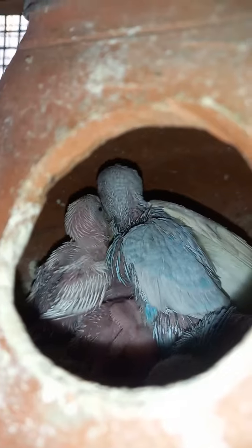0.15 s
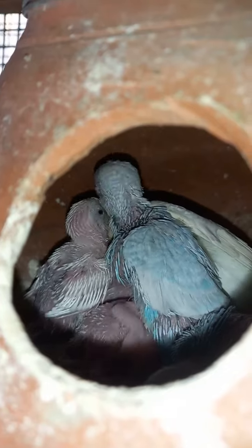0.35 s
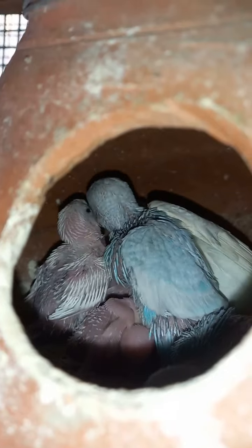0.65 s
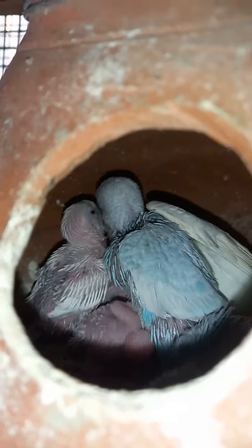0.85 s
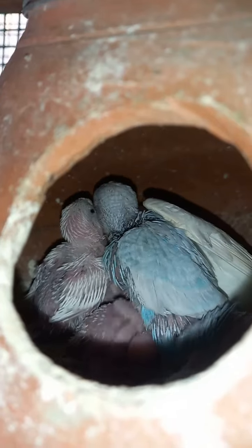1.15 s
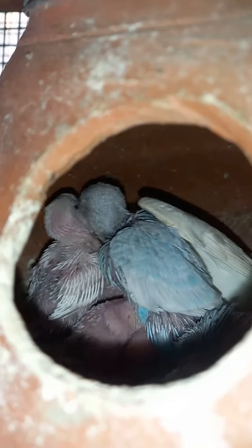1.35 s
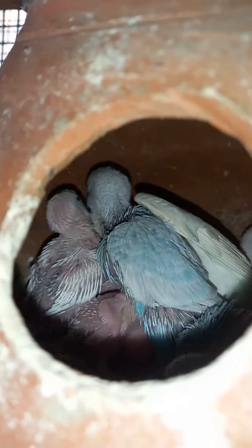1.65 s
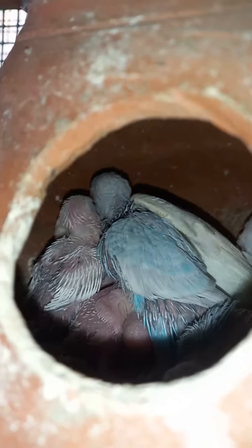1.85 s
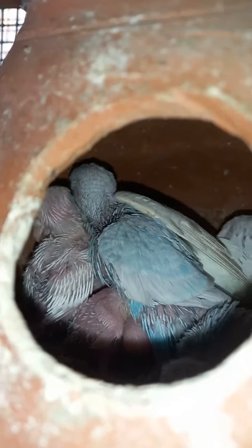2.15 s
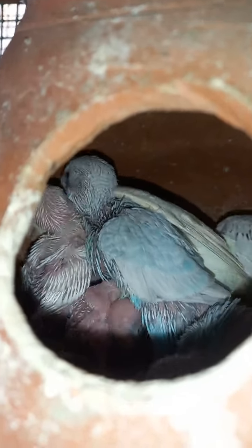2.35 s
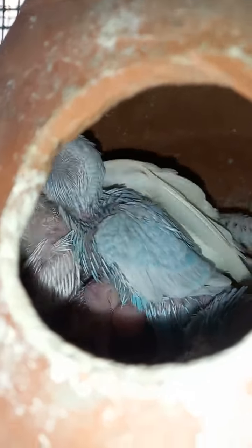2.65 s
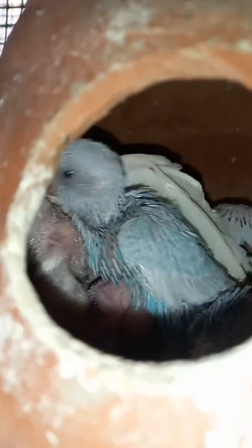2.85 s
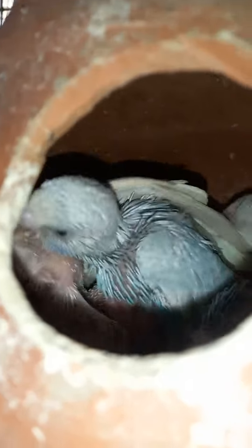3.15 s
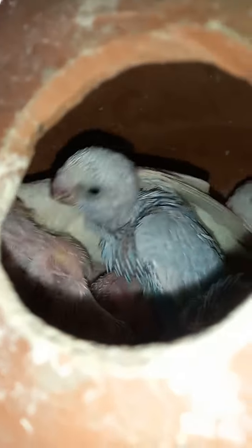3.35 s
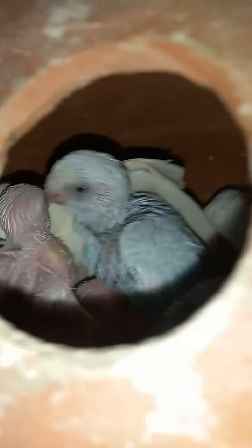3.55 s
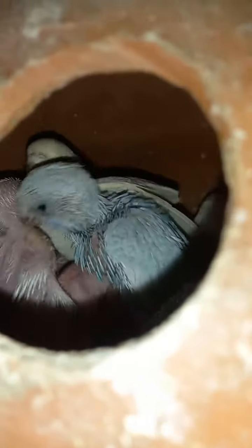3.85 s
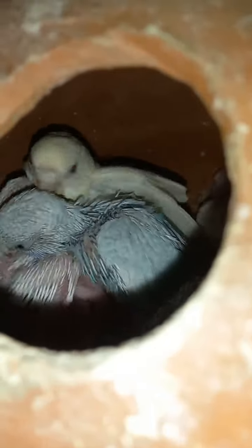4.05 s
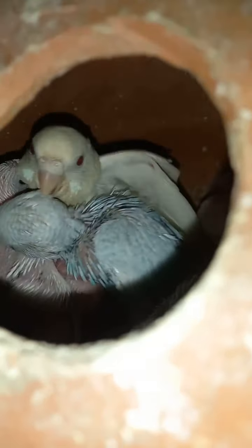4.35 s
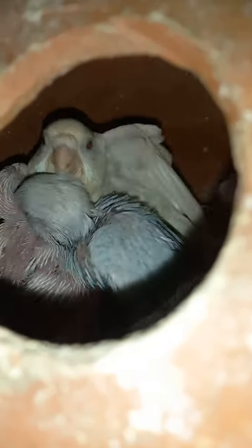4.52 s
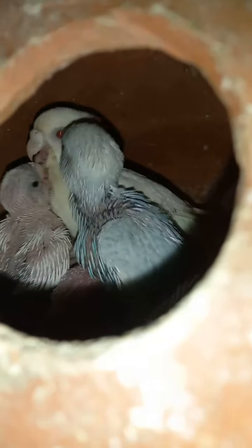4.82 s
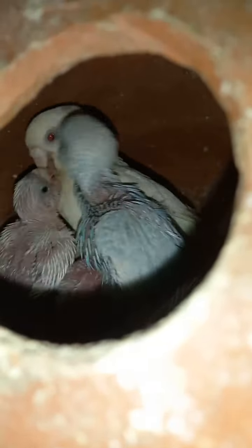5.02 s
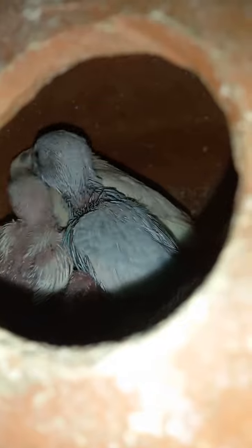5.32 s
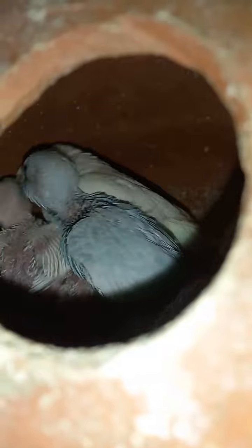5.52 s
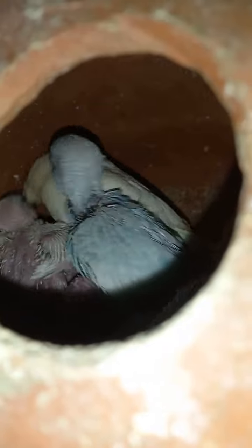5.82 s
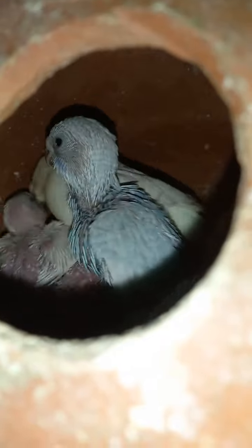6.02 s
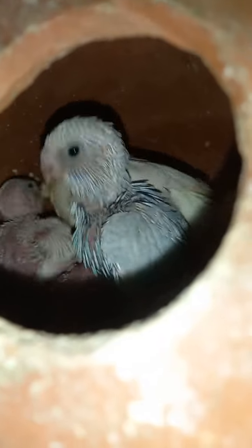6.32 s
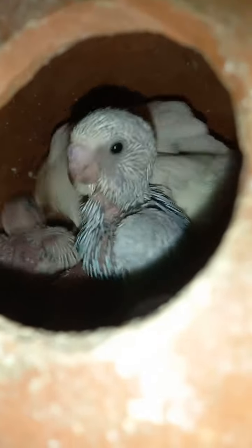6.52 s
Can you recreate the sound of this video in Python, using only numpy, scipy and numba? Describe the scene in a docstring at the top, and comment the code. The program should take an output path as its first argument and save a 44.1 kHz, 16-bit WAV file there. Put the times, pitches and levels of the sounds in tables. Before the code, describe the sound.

Close, raspy, high-pitched begging from a crowded nest of young parakeets, with sharp squeals near three and four seconds over soft low wing rustling.

```python
"""Budgerigar chicks beg in a clay nest pot: hoarse rasps, gliding peeps, tiny pips and two loud broken squeals.
Voices are phase-driven tones with random shake; rasps and hiss are shaped noise; pips are short tone bursts.
Chatter, hiss and croaks fill in behind; wings quiver in bouts of low noise over a faint room rumble.
The pot adds a brief dense ring, different at each of two close microphones; a gain control tames the squeals."""
import sys
import numpy as np
from scipy import signal
from scipy.fft import rfft, irfft, next_fast_len
from scipy.io import wavfile
from scipy.ndimage import uniform_filter1d, map_coordinates
from numba import njit

SR = 44100
rng = np.random.default_rng(int(sys.argv[2]) if len(sys.argv) > 2 else 0)


def generate_wav(sig):
    """Save sig (samples, or channels by samples) to the path in sys.argv[1] as 16-bit PCM at SR."""
    pcm = np.round(np.clip(np.atleast_2d(sig).T, -1, 1) * 32767).astype(np.int16)
    wavfile.write(sys.argv[1], SR, pcm)


N = 294588
CALL_T = np.arange(-SR // 50, SR // 5) / SR  # s, from 20 ms before a call's start


def amp(db):
    """Decibels to gain."""
    return 10 ** (np.asarray(db) / 20)


def unit(x):
    """Scale to rms 1."""
    return x / np.sqrt(np.mean(np.abs(x) ** 2) + 1e-20)


def along(points, hz):
    """(hz, value) points interpolated on a log frequency axis."""
    point_hz, value = np.transpose(points)
    return np.interp(np.log(hz + 1), np.log(point_hz + 1), value)


def curve(points):
    """(time_s, value) points interpolated to one value per sample."""
    time_s, value = np.transpose(points)
    return np.interp(np.arange(N) / SR, time_s, value)


def wobble(rate_hz, size=N):
    """Smooth random curve through rate_hz random knots a second."""
    knots = rng.standard_normal(int(size * rate_hz / SR) + 4)
    return map_coordinates(knots, [np.arange(size) * rate_hz / SR], mode="mirror")


def filtered(x, response):
    """Apply a gain that is a function of frequency in Hz."""
    size = x.shape[-1]
    fft_size = next_fast_len(size + 4096)
    spectrum = rfft(x, fft_size) * response(np.fft.rfftfreq(fft_size, 1 / SR))
    return irfft(spectrum, fft_size)[..., :size]


def noise(colour):
    """Two unrelated noises of the given spectrum, joint rms 1."""
    return unit(filtered(rng.standard_normal((2, N)), lambda hz: amp(along(colour, hz))))


def ragged(x, depth_db):
    """A chaotic syrinx: short-lived partials flicker in and out of the noise."""
    z = signal.stft(x, nperseg=256, noverlap=192)[2]
    field = uniform_filter1d(rng.standard_normal(z.shape[1:]), size=3, axis=0)
    field = uniform_filter1d(field, size=5, axis=1)
    flickering = signal.istft(z * amp(depth_db * unit(field)), nperseg=256, noverlap=192)[1]
    return unit(flickering[:, :x.shape[1]])


def edge(t_s, width_s):
    """Sine-shaped fade across t_s = 0, four widths long, 40 ms at most."""
    return (1 + np.sin(np.pi / 2 * np.clip(t_s / min(2 * width_s, 1 / 50), -1, 1))) / 2


def gate(t_s, length_s, rise_s, fall_s):
    """Window from 0 to length_s with soft edges."""
    return edge(t_s, rise_s) * edge(length_s - t_s, fall_s)


def bouts(table, attack_s, release_s):
    """Strength of (start_s, end_s, db) bouts that build up, hold and die away; powers add."""
    t, power = np.arange(N) / SR, np.zeros(N)
    for start_s, end_s, db in table:
        build = 1 - np.exp(-np.maximum(t - start_s, 0) / attack_s)
        decay = np.exp(-np.maximum(t - end_s, 0) / release_s)
        power += (amp(db) * build * decay) ** 2
    return np.sqrt(power)


def sides(pan_db):
    """Left and right gains of constant total power."""
    return unit(amp(np.array([[pan_db], [-pan_db]]) / 2))


def nearly_mono(pair, side_db):
    """Long waves reach both microphones almost alike."""
    return pair[0] + amp(side_db) * np.array([pair[1], -pair[1]])


def add(track, start_s, x):
    """Mix x into track from start_s on."""
    i = round(start_s * SR)
    part = x[:, max(-i, 0):max(N - i, 0)]
    track[:, max(i, 0):max(i, 0) + part.shape[1]] += part


# low resonances of pot and cage: centre_hz, width_hz, boost_db
HOLLOW_MODES = [(83, 25, 5), (105.6, 4.7, 9), (171, 31, 1.5), (226.6, 6, 3.5), (546, 20, 2.5)]


def hollow(x):
    """The hollow of the pot colours low sounds with its resonances; rms 1."""
    def boost_db(f):
        return sum(db / (1 + ((f - hz) / width * 2) ** 2) for hz, width, db in HOLLOW_MODES)
    return unit(filtered(x, lambda f: amp(boost_db(f))))


# rumble spectrum: freq_hz, relative_density_db
ROOM_COLOUR = [(25, -30), (60, -16), (110, -30), (230, 19), (350, 7.5), (700, -16), (1500, -6), (4000, -9)]


def room_rumble():
    """Steady low noise, nearly alike at both microphones."""
    return amp(-61.5) * hollow(nearly_mono(noise(ROOM_COLOUR), side_db=-4))


# quivering and brief shuffles: start_s, end_s, relative_level_db
WING_BOUTS = [(0.0, 0.12, -34.5), (0.27, 0.42, -42.5), (0.45, 0.64, -46.5), (0.78, 1.09, -36.5),
              (1.21, 1.41, -35), (1.45, 1.67, -43.5), (1.78, 1.85, -51), (1.96, 2.1, -50),
              (2.12, 2.19, -44.5), (2.52, 2.57, -57), (2.68, 2.82, -51.5), (2.87, 3.03, -40.5),
              (3.17, 3.62, -40), (3.64, 4.0, -38.5), (4.05, 4.32, -47), (4.39, 4.46, -55),
              (4.58, 4.7, -48.5), (4.91, 4.96, -52), (5.19, 5.28, -47), (5.36, 5.45, -52), (5.6, 5.7, -41),
              (5.72, 5.88, -33.5), (5.92, 6.19, -38), (6.33, 6.56, -49), (6.64, 6.69, -55)]
# wing noise spectrum: freq_hz, relative_density_db
FLUTTER_COLOUR = [(18, -51), (30, -38), (61, -3), (108, 1.5), (155, 4), (182, -8.5), (224, 5.5),
                  (309, -7.5), (453, 0), (1000, -15), (1300, -32), (2200, -120)]
WING_ATTACK_S, WING_RELEASE_S, SETTLE_RELEASE_S = 0.0069, 0.028, 0.15
SETTLE_REL_DB, RUSTLE_REL_DB = -6, -62.5  # soft settling after bouts; feathers never quite still


def wings(beat_rate_hz, beat_db):
    """Quivering wings brush the pot and pump its air: low noise with an uneven flutter."""
    quiver = bouts(WING_BOUTS, WING_ATTACK_S, WING_RELEASE_S)
    settle = amp(SETTLE_REL_DB) * bouts(WING_BOUTS, WING_ATTACK_S, SETTLE_RELEASE_S)
    strength = np.sqrt(quiver ** 2 + settle ** 2 + amp(RUSTLE_REL_DB) ** 2)
    flutter = nearly_mono(noise(FLUTTER_COLOUR), side_db=-8.5) * amp(beat_db * wobble(beat_rate_hz))
    return strength * hollow(flutter)


# ring time of the clay walls: freq_hz, t60_s
POT_DECAY = [(500, 0.043), (3000, 0.067), (12000, 0.069)]


def pot(x, wet_db, size=8192):
    """The clay walls return a short dense ring, unlike at each microphone, changing as the birds move."""
    ring, padded = np.zeros((2, N)), np.pad(x, ((0, 0), (size, size)))
    for i in range(-size // 2, N, size // 2):
        # each overlapping piece of sound gets a fresh random tail
        hz, t, z = signal.stft(rng.standard_normal((2, SR // 16)), SR, nperseg=128)
        decay = amp(-60 * t / along(POT_DECAY, hz)[:, None])
        tail = signal.istft(z * decay, SR, nperseg=128)[1]
        tail = tail / np.linalg.norm(tail, axis=1, keepdims=True)
        piece = padded[:, i + size:i + 2 * size] * np.sqrt(np.hanning(size))
        add(ring, i / SR + 1 / 1000, signal.fftconvolve(piece, tail, axes=1))
    return (x + amp(wet_db) * ring) / np.hypot(1, amp(wet_db))


GLIDE_EASE = 1.35  # above 1, a note glides fast at first and then levels off


def syrinx(length_s, first_hz, last_hz, hoarse, jitter, rasp_rate_hz):
    """Phase and complex strength of one gliding note; hoarseness shakes both."""
    t = CALL_T[CALL_T < length_s + 1 / 50]
    shake = np.array([wobble(rasp_rate_hz, size=len(CALL_T))[:len(t)] for _ in range(3)])
    hoarse = np.clip(hoarse, 0, 1)
    glide_hz = last_hz + (first_hz - last_hz) * (1 - np.clip(t / length_s, 0, 1)) ** GLIDE_EASE
    shaken_hz = glide_hz * (1 + jitter * np.sqrt(hoarse) * shake[0])
    phase = 2 * np.pi * np.cumsum(shaken_hz) / SR
    strength = np.sqrt(1 - hoarse) + np.sqrt(hoarse / 2) * (shake[1] + 1j * shake[2])
    return phase, strength


def chatter(centre_hz, spread, climb, hoarse, life_s, count):
    """Many overlapping little gliding chirps of the smaller chicks; overall rms 1."""
    out = np.zeros((2, N))
    for i, (when, pitch, life, slope, pan, lead) in enumerate(rng.triangular(-1, 0, 1, (count, 6))):
        length_s = np.clip(life_s * np.exp(life), .008, .12)
        hz = centre_hz * np.exp(spread * pitch)
        glide = np.exp(climb + 0.1006 * slope)
        phase, strength = syrinx(length_s, hz / glide, hz * glide, hoarse, jitter=0.018, rasp_rate_hz=700)
        voice = strength * np.exp(1j * phase) * gate(CALL_T[:len(phase)], length_s, 1 / 300, 1 / 200)
        ports = sides(7 * pan) * np.exp(1j * np.array([[0], [2 + 2 * lead]]))
        start_s = (i - 2) / (count - 2) * N / SR + .012 * when
        add(out, start_s, (ports * voice).real)
    return unit(out)


# chatter contour, also the floor of the croaking: time_s, relative_level_db
CHATTER_LEVEL = [(0.0, -31), (0.18, -30), (0.35, -26.5), (0.5, -25.5), (0.91, -30), (1.04, -33),
                 (1.26, -31), (1.47, -31), (1.65, -32), (1.84, -30), (2.51, -31), (2.9, -27.5), (3.14, -30),
                 (3.4, -30), (3.68, -33), (3.98, -28), (4.13, -34), (4.37, -32), (4.86, -33), (5.32, -31),
                 (5.6, -27.5), (5.95, -28.5), (6.31, -31), (6.36, -31.5), (6.51, -28.5), (6.68, -42)]


def brood_chirps(chatter_db):
    """The chatter's pitched chirps under a slow contour and a quick uneven wobble."""
    chirps = chatter(3100, spread=.32, climb=0.0391, hoarse=0.56, life_s=0.01618, count=900)
    return amp(chatter_db + 3.5 + 0.79 * wobble(23)) * chirps


# hiss contour: time_s, relative_level_db
HISS_LEVEL = [(0.0, -32.5), (0.33, -33), (0.72, -29.5), (0.93, -29.5), (1.17, -43), (1.3, -29.5),
              (1.69, -27), (1.93, -29), (2.18, -33), (2.44, -28), (3.83, -32), (4.0, -37.5), (4.24, -56),
              (4.39, -36), (4.71, -32.5), (5.08, -37), (5.36, -30), (5.64, -35), (5.95, -27), (6.12, -28.5),
              (6.29, -21.5), (6.68, -34.5)]
# hiss spectrum: freq_hz, relative_db
HISS_COLOUR = [(1000, -50), (3000, 13.5), (4200, 8), (6000, 6), (8000, 4), (11000, -9.5), (13500, -3),
               (16000, -15)]


def brood_hiss():
    """Soft breathy noise, flickering and grainy."""
    grains = noise(HISS_COLOUR) * amp(2.45 * wobble(400))
    return amp(curve(HISS_LEVEL) + 2) * ragged(grains, depth_db=7.0)


# low croaking bouts: start_s, end_s, relative_level_db
CROAK_BOUTS = [(0.1, 0.145, -33), (0.3, 0.42, -36.5), (0.54, 0.63, -32.5), (0.69, 0.72, -32),
               (0.86, 1.06, -32.5), (1.63, 1.68, -39), (1.77, 1.83, -35.5), (1.96, 2.07, -32),
               (2.14, 2.21, -33), (2.48, 2.58, -31.5), (2.69, 2.75, -34), (3.35, 3.52, -41.5),
               (3.66, 3.81, -37), (3.92, 4.0, -43), (4.64, 4.79, -37.5), (5.16, 5.26, -39),
               (5.62, 5.88, -37), (5.95, 6.07, -41), (6.12, 6.2, -31.5), (6.64, 6.69, -31.5)]
# croak spectrum: freq_hz, relative_db
CROAK_COLOUR = [(150, -17), (400, -15.5), (700, -12), (1100, -8), (1650, -2), (2200, 1), (3000, 2.5),
                (5000, -23.5)]
CROAK_ATTACK_S, CROAK_RELEASE_S, GRUMBLE_REL_DB = 0.0068, 0.005, -9.5


def brood_croaks(chatter_db):
    """Ragged low noise plus low chirps, in bouts over an ever-present grumble."""
    bout = bouts(CROAK_BOUTS, CROAK_ATTACK_S, CROAK_RELEASE_S)
    strength = np.hypot(bout, amp(chatter_db + GRUMBLE_REL_DB))
    rough = ragged(noise(CROAK_COLOUR) * amp(1.9 * wobble(250)), depth_db=1.5)
    low_chirps = chatter(1850, spread=0.42, climb=-0.0601, hoarse=0.55, life_s=0.02, count=400)
    return strength * (amp(3.5) * rough + amp(0.3) * low_chirps)


def brood():
    """Croaks, chirps and hiss go on between the nearer calls."""
    chatter_db = curve(CHATTER_LEVEL)
    return brood_croaks(chatter_db) + brood_chirps(chatter_db) + brood_hiss()


# very short pips: time_s (crest 2.3 ms later), relative_level_db, pitch_hz
PIP_CALLS = [(0.615, -10, 5970), (0.6305, -23, 6000), (0.684, -12, 5550), (0.7247, -11, 5700),
             (0.7364, -22, 5660), (3.1667, -11, 5830), (3.1842, -22, 5470), (3.204, -16, 5600),
             (3.216, -12, 5850), (3.226, -14, 5530), (3.301, -12, 6900), (3.3428, -15, 5360),
             (4.2664, -19, 6600), (4.407, -12, 6440), (4.415, -13, 6560), (4.4446, -15, 5660),
             (4.556, -14, 5870), (4.579, -16, 5450), (4.6149, -17, 5860), (4.643, -13.5, 5700),
             (4.6833, -18, 5370), (6.136, -12, 5470), (6.1485, -8, 5540), (6.292, -15, 5500),
             (6.3919, -20, 5200)]
# partials of a pip: pitch_ratio, relative_db
PIP_PARTIALS = [(1, -1.5), (1.45, -8), (1.8, -14), (2.35, -17)]


def pips(width_s, sweep_per_s):
    """Each pip is a few milliseconds of rising tone with higher partials."""
    out, t = np.zeros((2, N)), np.arange(-SR // 100, SR // 100) / SR
    leads_rad = rng.uniform(0, 2 * np.pi, (len(PIP_CALLS), 2, 1))
    for (time_s, db, hz), lead_rad in zip(PIP_CALLS, leads_rad):
        phase = 2 * np.pi * hz * (t + sweep_per_s * t ** 2 / 2) + lead_rad
        tone = sum(amp(level) * np.sin(ratio * phase) for ratio, level in PIP_PARTIALS)
        add(out, time_s + t[0] + 0.0023, amp(db) * tone * np.exp(-(t / width_s) ** 2))
    return out


# hissing rasps: start_s, end_s, relative_level_db, beak_hz, brightness_db
RASP_CALLS = [(0.0, 0.065, -23.5, 8700, -9), (0.144, 0.283, -24.5, 6760, 5), (0.29, 0.386, -27, 6400, 5.5),
              (0.388, 0.457, -22.5, 5950, 1), (0.504, 0.608, -27.5, 8700, -12),
              (0.621, 0.75, -26.5, 8950, -3), (0.731, 0.814, -26.5, 8540, 1),
              (0.813, 0.887, -22.5, 5000, 4.5), (1.108, 1.198, -24, 7500, 4), (1.205, 1.336, -25, 6950, 4),
              (1.345, 1.388, -24.5, 8000, 7), (1.407, 1.525, -22, 6160, 8), (1.536, 1.604, -26, 7750, 6),
              (1.645, 1.728, -21.5, 5540, 5.5), (1.761, 1.847, -20.5, 4700, 2),
              (1.848, 1.913, -24, 6960, 9.5), (2.206, 2.269, -23.5, 7740, 10.5),
              (2.321, 2.471, -23.5, 5840, 9), (2.497, 2.556, -27, 5800, 4), (2.577, 2.69, -24.5, 6700, 5),
              (2.691, 2.75, -29, 4800, 9), (2.786, 2.878, -23.5, 8600, -2.5),
              (2.899, 3.01, -29.5, 4500, -14), (3.106, 3.145, -19.5, 6650, 8),
              (3.222, 3.308, -25, 5500, 5.5), (3.344, 3.413, -25.5, 6850, 3.5),
              (3.454, 3.503, -22.5, 4600, 1), (3.538, 3.594, -26.5, 7840, 1), (3.623, 3.697, -28, 7900, -3),
              (3.767, 3.875, -29.5, 7900, 0), (3.951, 4.055, -27.5, 8800, -7), (4.194, 4.284, -28, 6350, 6),
              (4.298, 4.414, -29, 8500, -4), (4.449, 4.562, -27.5, 8300, 5), (4.69, 4.727, -27, 9400, -1),
              (4.778, 4.85, -28.5, 8700, 2), (4.859, 4.927, -26.5, 5350, 6), (4.955, 5.099, -27, 5960, 5.5),
              (5.116, 5.213, -32, 6150, 1), (5.23, 5.36, -31, 6250, 6), (5.374, 5.46, -27.5, 7000, 4),
              (5.46, 5.54, -26.5, 8600, -8), (5.621, 5.683, -24.5, 4540, 1), (5.731, 5.794, -25.5, 4760, 1),
              (5.89, 5.938, -26, 6050, 11), (5.971, 6.111, -27, 6500, 6.5), (6.116, 6.182, -28.5, 5700, 2),
              (6.189, 6.276, -22.5, 5560, 5), (6.284, 6.366, -23, 5300, 4), (6.374, 6.477, -22.5, 9500, -7),
              (6.555, 6.628, -24.5, 7650, 5), (6.624, 6.69, -27, 7900, -11)]
# common rasp spectrum: freq_hz, relative_db
RASP_COLOUR = [(300, -55), (900, -21), (1800, -5.5), (2800, 0), (4000, 4.5), (5500, 2), (7500, -2),
               (10500, -8), (13300, -12.5), (16000, -14.5)]
RASP_PAN_DB, RASP_PAN_SCATTER_DB = -0.8, 3.9


def rasps(grain_db, grain_rate_hz, ragged_db, beak_db, beak_width_hz, rise_s, fall_s):
    """Air forced through the syrinx in irregular puffs and coloured by the open beak."""
    out, size = np.zeros((2, N)), len(CALL_T)
    for start_s, end_s, db, beak_hz, bright_db in RASP_CALLS:
        def response(hz):
            beak = beak_db / (1 + ((hz - beak_hz) / beak_width_hz) ** 2)
            tilt = bright_db * np.clip((hz - 7000) / 4000, 0, 1)
            return amp(along(RASP_COLOUR, hz) + beak + tilt)
        pan_db = RASP_PAN_DB + RASP_PAN_SCATTER_DB * rng.standard_normal()
        puffs = ragged(rng.standard_normal((2, size)), ragged_db)
        puffs = puffs * amp(grain_db * wobble(grain_rate_hz, size=size))
        hiss = unit(filtered(puffs, response)) * gate(CALL_T, end_s - start_s, rise_s, fall_s)
        add(out, start_s + CALL_T[0], amp(db) * sides(pan_db) * hiss)
    return out


def notes(table, throat, jitter, rasp_rate_hz, throb_db, throb_rate_hz, rise_s, fall_s):
    """Voiced notes with overtones 2 to 4, each reaching the microphones from its own place."""
    out = np.zeros((2, N))
    for start_s, end_s, first_hz, last_hz, db, hoarse, pan_db, lead_rad, overtones_db in table:
        length_s = max(end_s - start_s, 1 / 200)
        mean_hz = (first_hz + last_hz) / 2
        phase, strength = syrinx(length_s, first_hz, last_hz, hoarse, jitter, rasp_rate_hz)
        overtones = sum(amp(along(throat, k * mean_hz)) * np.exp(1j * k * phase) for k in range(2, 5))
        window = gate(CALL_T[:len(phase)], length_s, rise_s, fall_s)
        # where throb_db is above 0 the membranes beat unevenly and pulse the note
        uneven = 1 + wobble(104.4, size=len(CALL_T))[:len(phase)] / 2
        beats = np.cumsum(throb_rate_hz * uneven) / SR
        strength = strength * amp(throb_db * np.sin(2 * np.pi * beats)) * window
        envelope = unit(strength) * np.sqrt(np.mean(window ** 2))
        voice = envelope * (np.exp(1j * phase) + amp(overtones_db) * overtones)
        ports = sides(pan_db) * np.exp(1j * np.array([[lead_rad], [-lead_rad]]) / 2)
        add(out, start_s + CALL_T[0], amp(db) * (ports * voice).real)
    return out


# seat of each chick, by name: left_right_db, left_lead_rad
CHICK_SEATS = {"front": (1.1, 1.4), "back": (1.5, -1.84), "left": (18, -1.1), "right": (-17, 2.2),
               "middle": (1, 0.3)}
# overtone strength of begging notes: freq_hz, relative_db
PEEP_THROAT = [(2000, -18), (7000, -14), (10500, -18.5), (13500, -23), (16000, -36)]
BEGGING_OVERTONES_DB = -10


def begging(table):
    """Peeps and mutters share one throat and a pulsing throb."""
    return notes(table, PEEP_THROAT, jitter=0.052, rasp_rate_hz=1000, throb_db=3.0, throb_rate_hz=130,
                 rise_s=0.015, fall_s=0.012)


# low mutters: start_s, end_s, first_pitch_hz, relative_level_db
MUTTER_CALLS = [(0.582, 0.633, 1060, -47), (1.02, 1.067, 1270, -29.5), (1.612, 1.67, 2150, -28),
                (1.951, 1.983, 1620, -30), (2.058, 2.134, 1500, -37), (2.132, 2.163, 1127, -32),
                (3.069, 3.085, 1820, -13), (3.199, 3.225, 2220, -20.5), (3.35, 3.39, 2300, -25),
                (4.76, 4.806, 1750, -30), (4.847, 4.887, 1340, -43), (5.951, 5.983, 1820, -28)]
MUTTER_SAG_OCT_PER_S, MUTTER_HOARSE = 3.44, .12


def mutters():
    """Low voiced notes from the front seat, all sagging at the same rate."""
    table = []
    for start_s, end_s, first_hz, db in MUTTER_CALLS:
        last_hz = first_hz * 2 ** (-MUTTER_SAG_OCT_PER_S * (end_s - start_s))
        table.append((start_s, end_s, first_hz, last_hz, db, MUTTER_HOARSE,
                      *CHICK_SEATS["front"], BEGGING_OVERTONES_DB))
    return begging(table)


# begging peeps: start_s, end_s, first_pitch_hz, last_pitch_hz, relative_level_db, hoarse_0_to_1, seat
PEEP_CALLS = [(0.07, 0.123, 3230, 2920, -25, 0.22, "front"),
              (0.303, 0.366, 3140, 3640, -15.5, 0.9, "front"), (0.367, 0.438, 2890, 3280, -22, 1, "middle"),
              (0.473, 0.499, 3790, 3706, -11, 0.2, "middle"),
              (0.468, 0.508, 2590, 2630, -19.5, 0.23, "middle"),
              (0.54, 0.597, 2956, 2870, -19.5, .48, "front"), (0.592, 0.63, 2000, 2070, -22.5, 0, "front"),
              (0.643, 0.676, 2740, 3150, -18.5, 0.15, "left"), (0.716, 0.8, 2910, 4250, -16.5, 0.3, "back"),
              (0.785, 0.813, 3420, 3030, -18.5, 0.18, "left"), (0.92, 1.01, 3040, 4230, -15, 0.52, "back"),
              (1.021, 1.072, 3030, 3520, -17, 0.5, "front"), (1.356, 1.41, 3225, 3213, -22, 0.45, "front"),
              (1.441, 1.5, 3160, 2980, -22, 0.3, "left"), (1.518, 1.57, 2925, 2950, -16.5, 0.3, "left"),
              (1.552, 1.641, 3574, 3800, -15, 0.16, "front"), (1.642, 1.699, 2900, 3115, -14, 1, "back"),
              (1.679, 1.745, 3660, 3760, -13, 0.12, "front"),
              (1.792, 1.852, 3310, 3650, -14.5, 0.7, "back"), (1.872, 1.899, 3990, 3760, -10, .15, "front"),
              (1.926, 1.996, 3920, 3676, -15.5, 0.38, "front"),
              (2.001, 2.059, 3475, 3540, -13.5, 1, "front"),
              (2.072, 2.126, 3970, 3665, -16.5, 0.06, "back"),
              (2.272, 2.328, 3050, 3183, -19.5, 0.4, "left"), (2.54, 2.585, 3510, 3920, -22.5, .4, "right"),
              (2.684, 2.742, 3110, 3020, -15.5, 0.6, "left"), (2.76, 2.795, 3020, 3110, -18, 0, "left"),
              (2.876, 2.943, 3400, 3960, -16, 0.65, "back"),
              (2.983, 3.006, 3480, 3480, -13.5, .72, "front"),
              (3.157, 3.195, 3050, 2460, -26, 0.13, "front"),
              (3.315, 3.354, 3020, 3110, -19.5, 0.05, "left"),
              (3.562, 3.639, 3010, 2970, -23, 0.26, "back"), (3.629, 3.69, 3990, 4490, -22, 0.7, "back"),
              (3.812, 3.898, 3530, 3850, -18, 0.8, "back"), (3.955, 4.002, 3730, 3980, -17.5, 0.8, "back"),
              (4.324, 4.355, 2810, 3070, -20, 0.16, "left"), (4.394, 4.421, 2930, 3190, -27, 0.15, "right"),
              (4.612, 4.68, 3326, 2910, -26.5, .3, "front"), (4.741, 4.794, 2994, 2730, -24, 0.44, "front"),
              (4.893, 4.995, 2800, 4230, -18.5, 0.4, "back"), (5.126, 5.209, 2880, 3010, -28, 0.4, "front"),
              (5.365, 5.409, 3920, 4340, -16, .43, "front"), (5.473, 5.51, 4050, 3750, -12.5, 0.55, "back"),
              (5.5, 5.553, 3620, 3630, -14, 0.06, "back"), (5.579, 5.623, 2895, 3600, -19.5, 0.63, "left"),
              (5.642, 5.716, 3890, 3556, -13.5, 0.36, "back"),
              (5.713, 5.757, 2470, 2450, -23.5, .2, "middle"),
              (5.738, 5.777, 3720, 3760, -16.5, 0.3, "back"), (5.808, 5.84, 3570, 3880, -19, 0.22, "left"),
              (5.828, 5.859, 2980, 3440, -11.5, 0.11, "back"), (5.872, 5.905, 3140, 3910, -14.5, 0, "left"),
              (5.894, 5.922, 6020, 6120, -20, 0.3, "right"), (5.911, 5.963, 3110, 4100, -18.5, 0.1, "back"),
              (5.969, 6.013, 6500, 6500, -17.5, 0.5, "middle"),
              (6.037, 6.07, 3020, 2975, -19, 0.44, "front"), (6.06, 6.093, 6580, 6200, -16, .4, "back"),
              (6.158, 6.24, 3095, 2836, -19.5, 0.8, "middle"),
              (6.414, 6.485, 3560, 3700, -19, 0.84, "back"),
              (6.48, 6.531, 3795, 3450, -10.5, 0.38, "front")]


def peeps():
    """Gliding, more or less hoarse notes, each from its chick's seat."""
    return begging([(*note, *CHICK_SEATS[seat], BEGGING_OVERTONES_DB) for *note, seat in PEEP_CALLS])


# squeaks and squeals, the long ones broken by pitch jumps:
# start_s, end_s, first_pitch_hz, last_pitch_hz, relative_level_db, hoarse_0_to_1,
# left_right_db, left_lead_rad, overtones_db
SQUEAL_CALLS = [(2.15, 2.186, 4430, 4730, -11.5, 0.38, -1, -1.5, 11),
                (2.32, 2.365, 5090, 4980, -19.5, 0.32, -1, 1.5, 4),
                (2.695, 2.785, 4700, 4290, -18.5, 0.28, 0, 1.1, 5),
                (3.038, 3.046, 4260, 4140, -2, 0.11, 0, 0.74, 3),
                (3.047, 3.072, 3283, 3405, -7, .12, 1, 4, 5.5),
                (3.07, 3.085, 4200, 4190, -11.5, 0.55, -3, 3.5, -8),
                (3.083, 3.112, 3286, 3470, -3.5, 0.18, 1.5, 4, 4.5),
                (3.108, 3.152, 3526, 3550, -5.5, 0.8, 0, 4.5, -3),
                (4.043, 4.061, 4320, 4190, -12.5, .2, -3, 1.5, 9),
                (4.061, 4.087, 3460, 3570, -5.5, 0.11, 9, 8, -20),
                (4.091, 4.116, 3700, 3570, -5, 0.24, -0.5, 4, -11),
                (4.116, 4.152, 3360, 3606, -3, 0.5, 4, 4, -7.5)]
# overtone strength of squeals: freq_hz, relative_db
SQUEAL_THROAT = [(3000, -18), (6800, -15.5), (8800, -23.5), (10500, -34), (13500, -21.5), (16000, -11)]


def squeals():
    """Loud voiced notes; abutting pieces at different pitches break a long squeal."""
    return notes(SQUEAL_CALLS, SQUEAL_THROAT, jitter=0.046, rasp_rate_hz=870, throb_db=0.0,
                 throb_rate_hz=135.6, rise_s=0.0039, fall_s=0.0087)


def scene():
    """All the chicks in their pot, the squealing one nearest, over wings and room rumble."""
    hisses = rasps(grain_db=1.74, grain_rate_hz=550, ragged_db=3.5, beak_db=8, beak_width_hz=930,
                   rise_s=0.0077, fall_s=0.018)
    calls = brood() + amp(-0.5) * pips(width_s=0.0012, sweep_per_s=11)
    calls = calls + amp(2.5) * hisses + amp(-0.5) * (mutters() + peeps())
    flutter = amp(-1.0) * wings(beat_rate_hz=47, beat_db=0.7)
    return room_rumble() + flutter + pot(calls, wet_db=-3.5) + pot(amp(2.5) * squeals(), wet_db=-6.5)


@njit
def follow(power, attack, release):
    """Level detector that rises fast and falls slowly; times in samples."""
    out, level = np.empty_like(power), 0.0
    for i in range(len(power)):
        level += (power[i] - level) / (attack if power[i] > level else release)
        out[i] = level
    return out


LIMIT_DB, LIMIT_ATTACK_S, LIMIT_RELEASE_S, TOP_HZ = -8, 0.0039, 0.033, 16050


def record(dry):
    """Gain control turns loud calls down, peaks are rounded, and nothing passes above TOP_HZ."""
    power = follow(np.mean(dry ** 2, axis=0), LIMIT_ATTACK_S * SR, LIMIT_RELEASE_S * SR)
    held = dry / np.maximum(1, np.sqrt(power) / amp(LIMIT_DB))
    rounded = held / (1 + (np.abs(held) / .9) ** 8) ** (1 / 8)
    return filtered(rounded, lambda hz: hz < TOP_HZ)


dry = scene()
out = record(dry)
generate_wav(out)
```